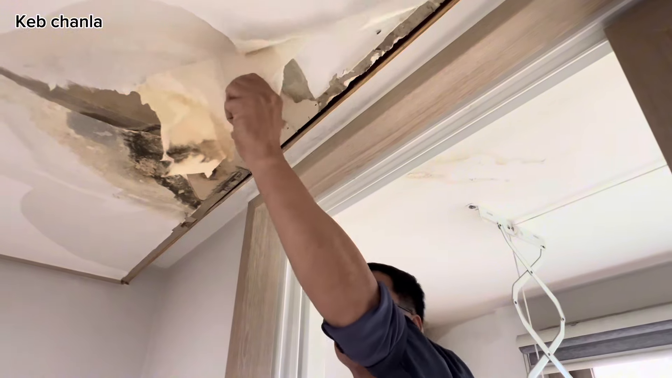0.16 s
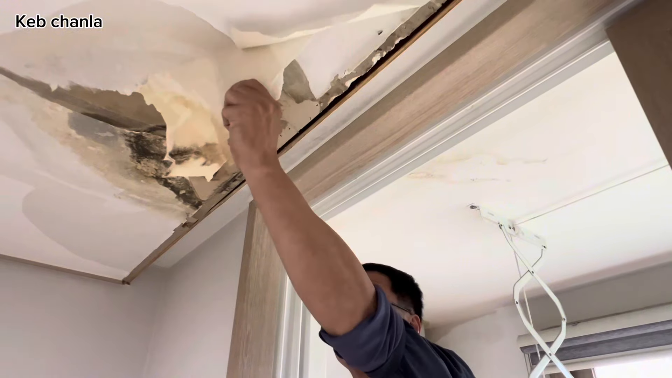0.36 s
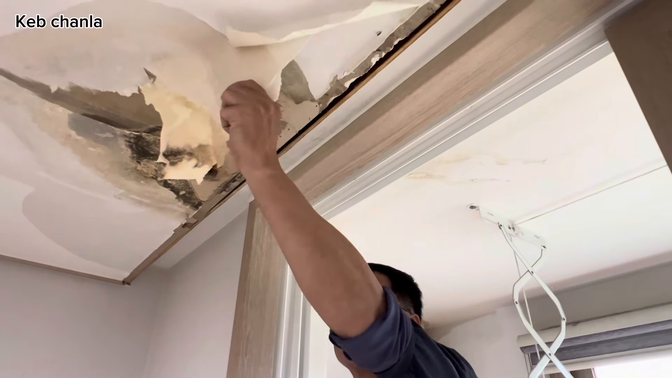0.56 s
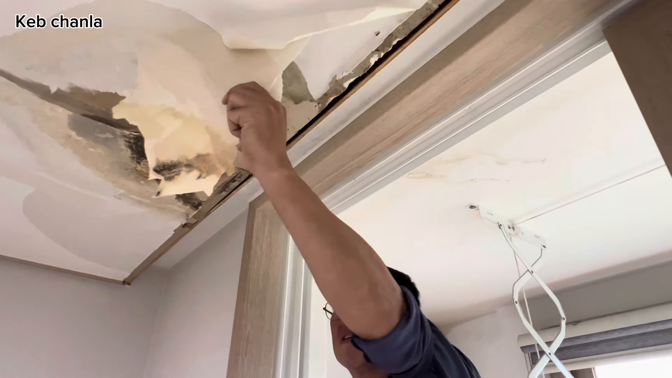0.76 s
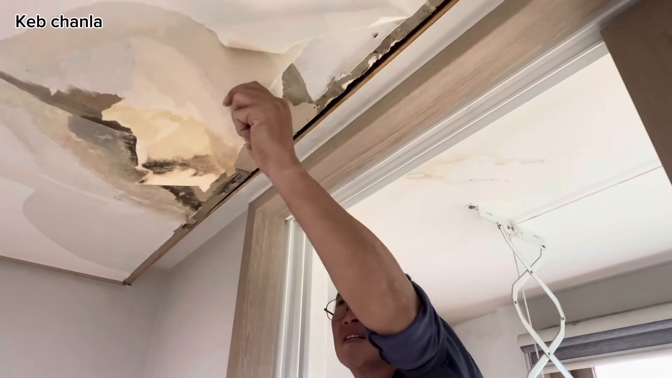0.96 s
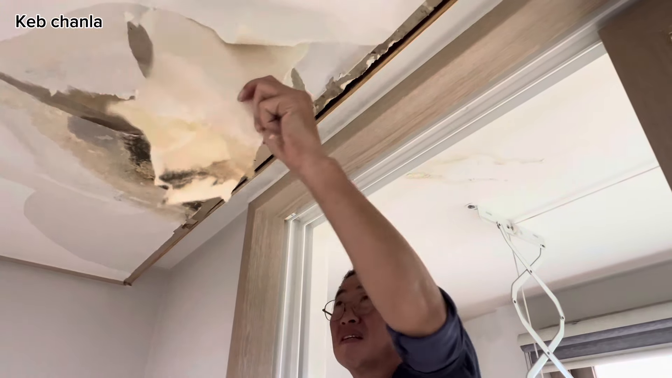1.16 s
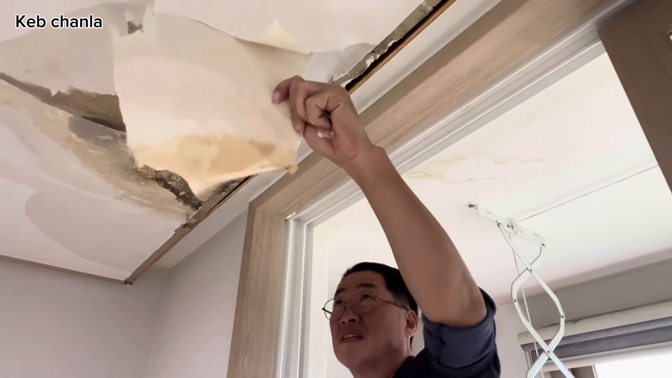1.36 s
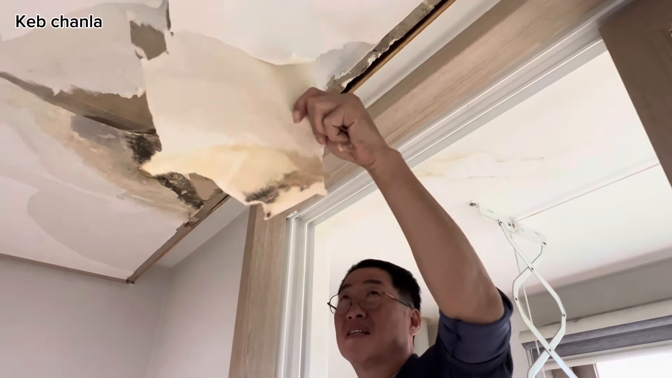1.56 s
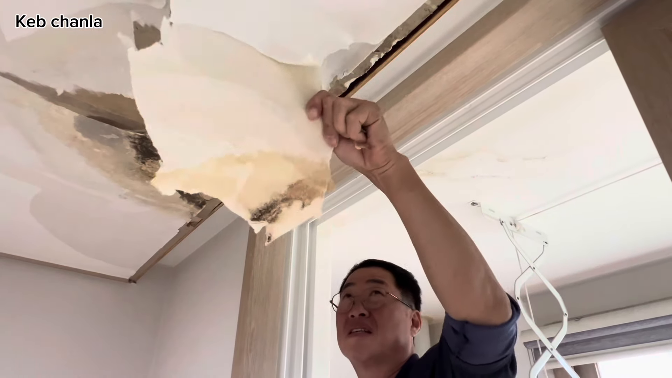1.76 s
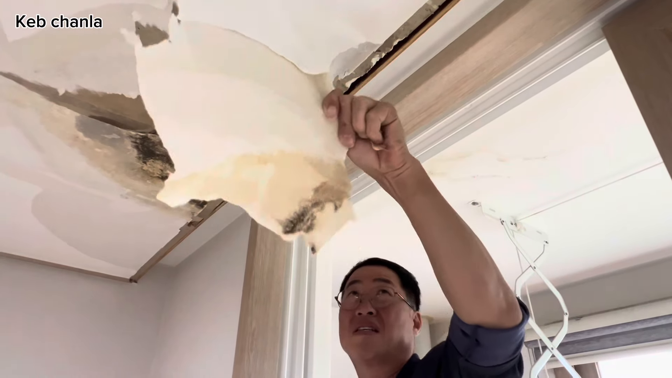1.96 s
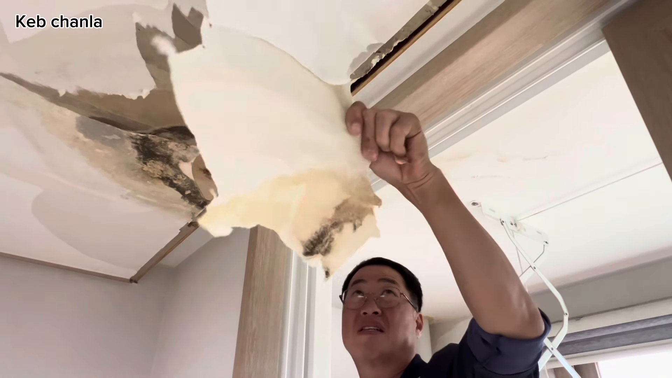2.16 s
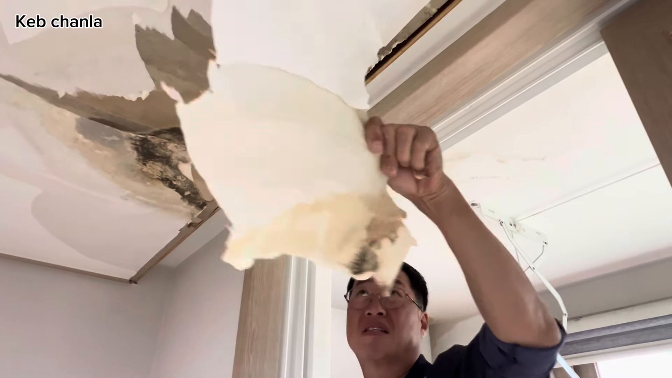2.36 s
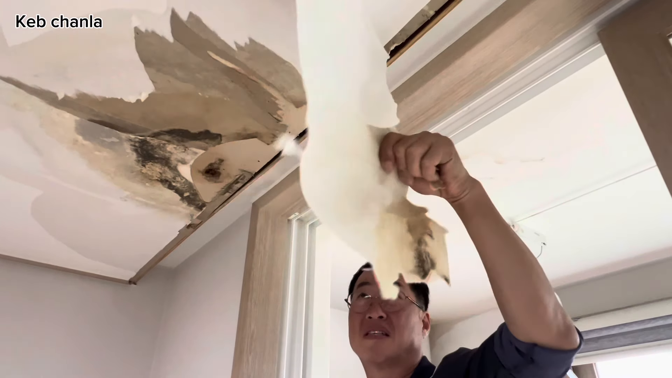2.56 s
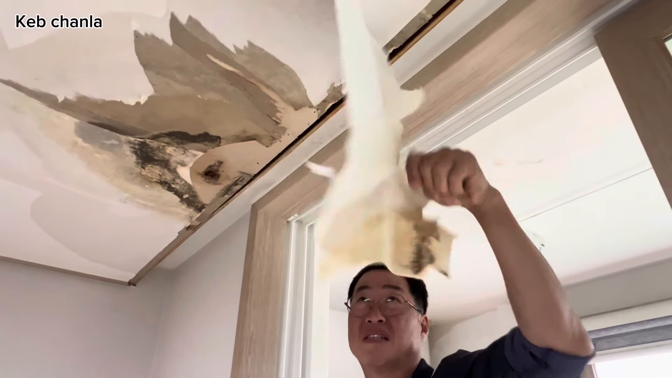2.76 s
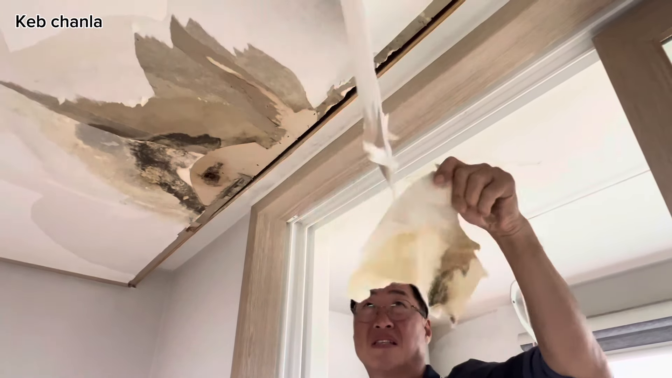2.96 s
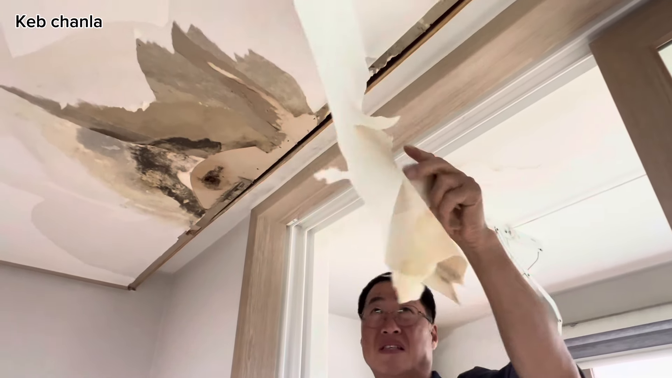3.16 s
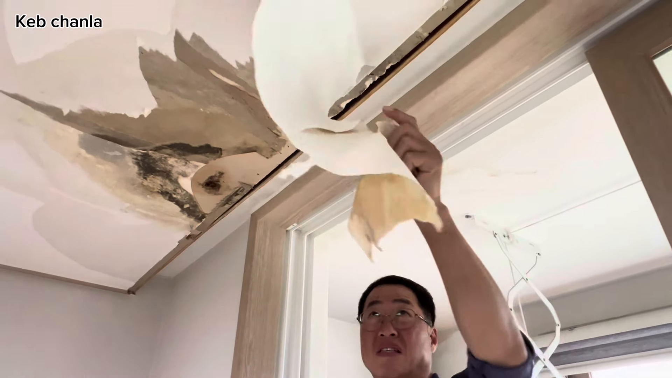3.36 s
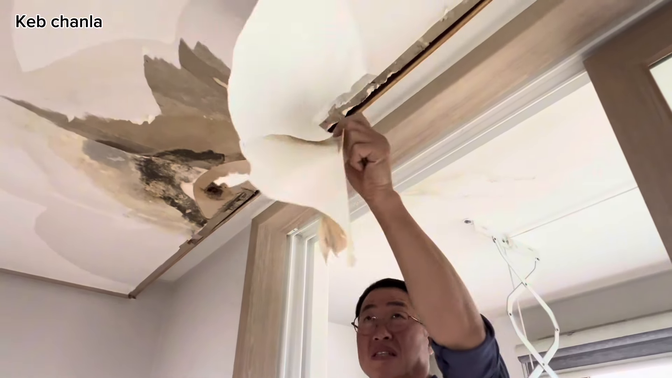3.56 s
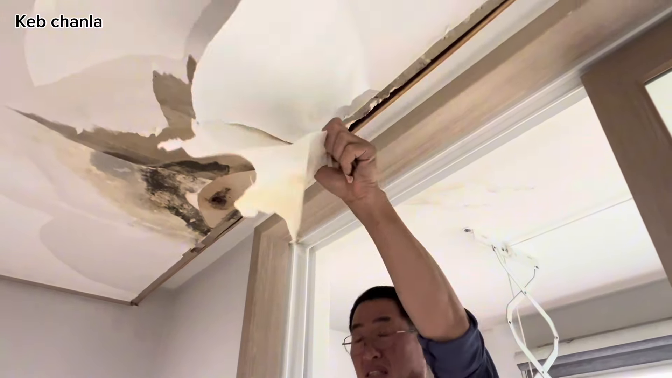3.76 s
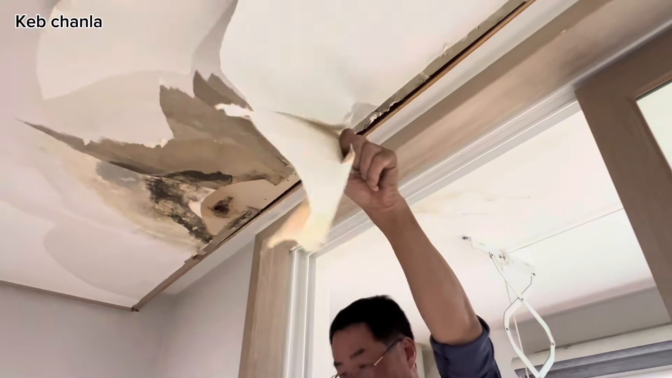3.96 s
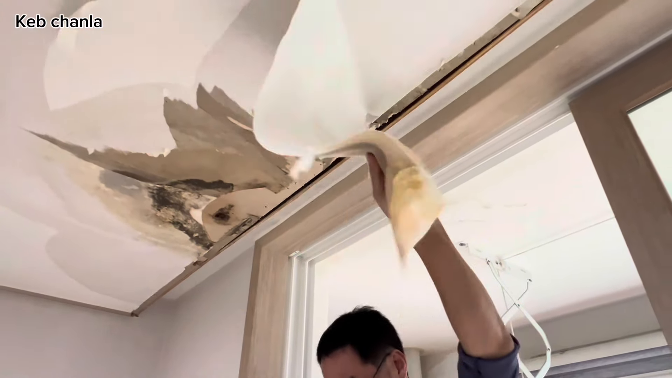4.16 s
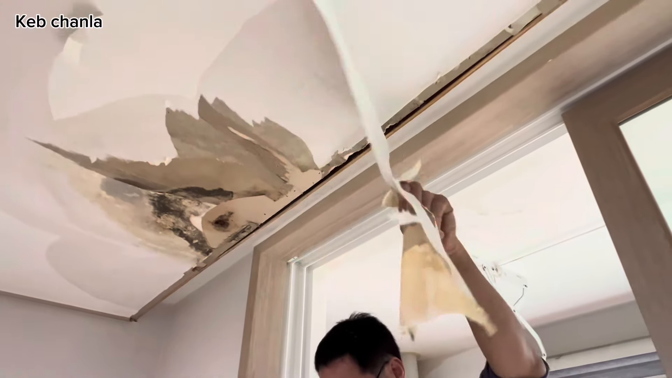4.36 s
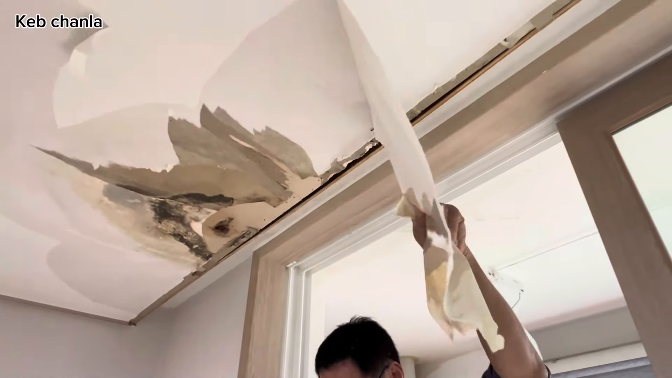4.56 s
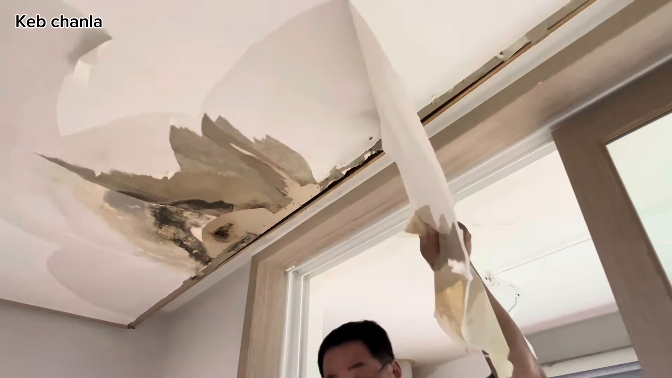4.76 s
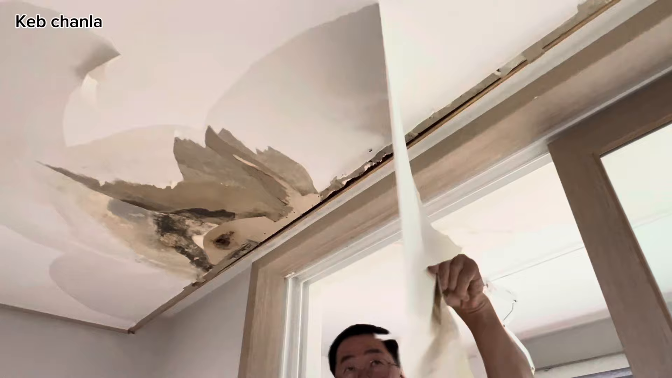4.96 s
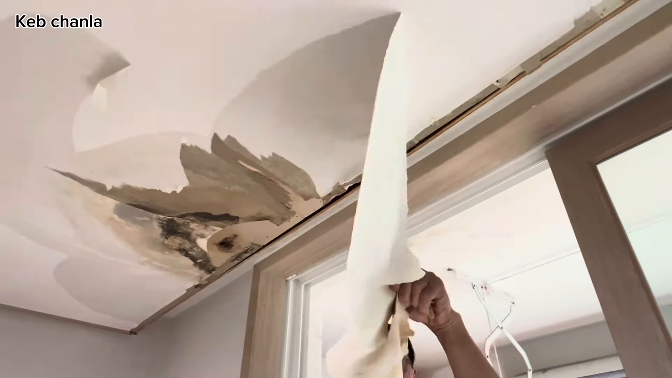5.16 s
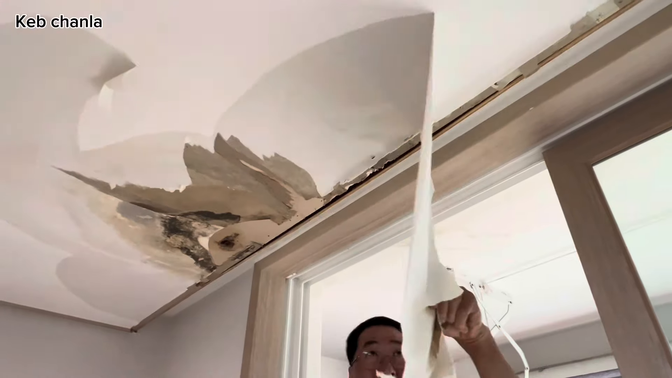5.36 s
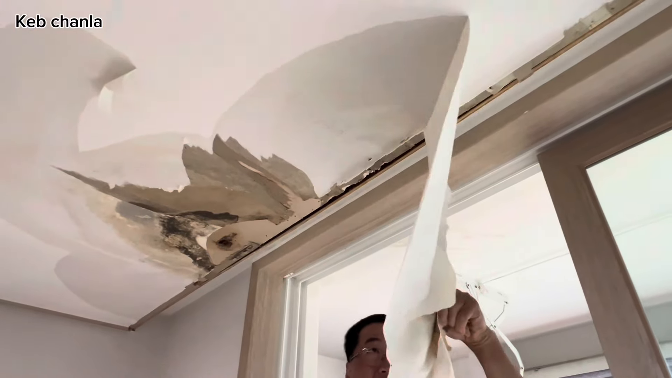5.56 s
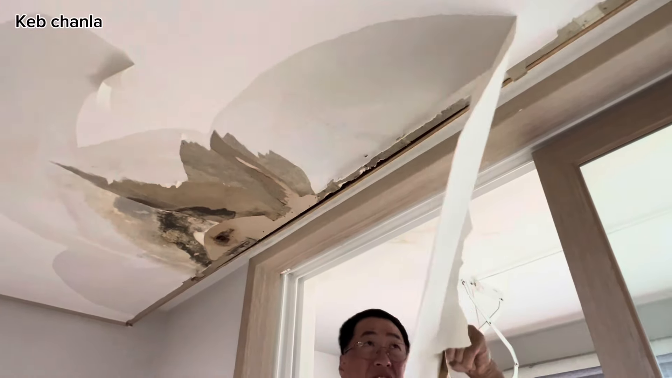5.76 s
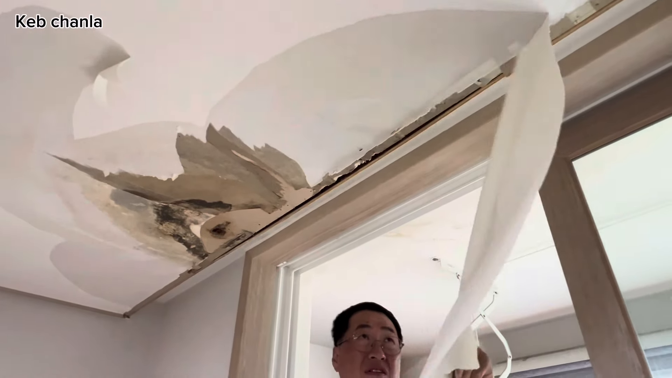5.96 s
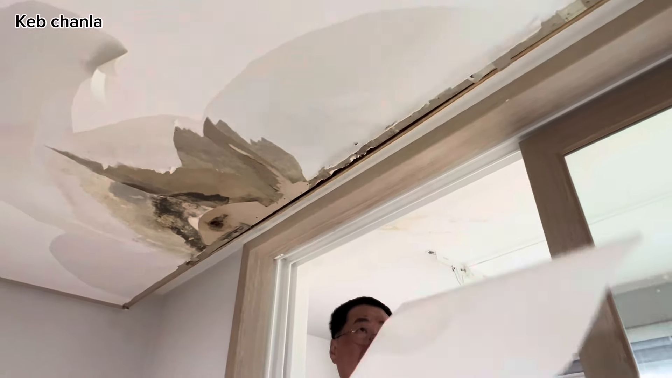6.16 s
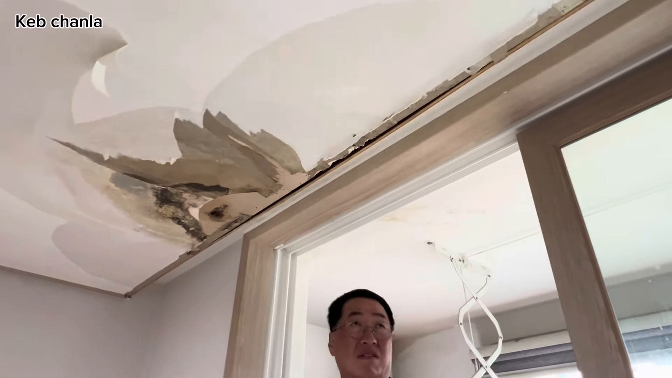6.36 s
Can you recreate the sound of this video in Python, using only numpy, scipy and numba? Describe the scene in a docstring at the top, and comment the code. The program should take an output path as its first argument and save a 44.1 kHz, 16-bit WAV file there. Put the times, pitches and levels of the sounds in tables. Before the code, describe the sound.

Close to a ceiling indoors, damp wallpaper tears loose tug by tug, crackling and rasping with bright fibre fizz and hollow fluttering of the sheet. The first rip stops, leaving light brushes and small dull pops of hanging paper. Then a hard crack and a second rip swells to its loudest, finishes with snaps, and fades into quiet room tone with a short bare-room echo.

```python
"""Wallpaper pulled off a ceiling

Damp paper comes off by hand in two long rips, tug by tug; between them the slack sheet rustles and pops.
Random trains of tiny breaks along the peel line are filtered into rasp, fizz, rustle and ringing paper.
Shaken low modes make the sheet drum and flap; noise bursts snap; falling sines pop.
A small bare room answers with sparse reflections and a short tail, over a quiet room tone."""
import sys
import numpy as np
from scipy import signal
from scipy.fft import rfft, irfft
from scipy.io import wavfile
from scipy.ndimage import uniform_filter1d, map_coordinates
from numba import njit

SR = 44100
rng = np.random.default_rng(int(sys.argv[2]) if len(sys.argv) > 2 else 0)


def inscribe(sig):
    """Save sig as 16-bit PCM at rate SR to the path in sys.argv[1].

    A 1-D sig is mono; a 2-D sig holds one channel per row.
    Samples are clipped to [-1, 1] before scaling.
    """
    pcm = np.round(np.clip(np.atleast_2d(sig).T, -1, 1) * 32767)
    wavfile.write(sys.argv[1], SR, pcm.astype(np.int16))


N = 286385
T = np.arange(N) / SR
HZ = np.fft.rfftfreq(N, 1 / SR)


def amp(db):
    """Decibels to gain."""
    return 10 ** (np.asarray(db) / 20)


def unit(x):
    """Scales to rms 1."""
    return x / np.sqrt(np.mean(x ** 2) + 1e-20)


def over_time(rows):
    """The columns of a curve table at every sample."""
    s, *columns = np.transpose(rows)
    return [np.interp(T, s, c) for c in columns]


def over_hz(points, hz):
    """Reads a spectrum table on a log-frequency axis."""
    f, value = np.transpose(points)
    return np.interp(np.log(hz + 1), np.log(f), value)


def colour(x, points):
    """Gives x a spectrum, at rms 1."""
    return unit(irfft(rfft(x) * amp(over_hz(points, HZ)), N))


def wander(top_hz):
    """Slow random curve of rms 1."""
    return unit(irfft(rfft(rng.standard_normal(N)) / (1 + (HZ / top_hz) ** 4), N))


ALIKE_HALF_HZ = 344  # microphone correlation has fallen to one half here


def diffuse(pair):
    """Sound from all sides: two nearby microphones agree only on long waves."""
    n = pair.shape[1]
    a, b = rfft(pair)
    hz = np.fft.rfftfreq(n, 1 / SR)
    same = 1 / (1 + (hz / ALIKE_HALF_HZ) ** 2)
    other = np.sqrt(np.clip(1 - same ** 2, 0, 1))
    return irfft(np.array([a, same * a + other * b]), n)


# Spectrum of the quiet room. Each row: frequency [Hz], relative level [dB].
ROOM_TONE_SPECTRUM = [(20, -1.5), (35, 11.5), (70, 12.5), (130, 8), (250, 2.5), (600, -45), (1200, -18),
                      (2500, -27), (6000, -37), (9000, -28), (16000, -66)]


def room_tone():
    """Steady coloured noise arriving from all sides."""
    return amp(-63.5) * diffuse(colour(rng.standard_normal((2, N)), ROOM_TONE_SPECTRUM))


STROKE_DB = 20  # rise over the build, equal fall over the release
STROKE_CURVE = 1.15  # above 1: round top, steep flanks


def strokes(s, build, hold, release):
    """One power envelope for each stroke of the hand: it builds, holds and lets go."""
    before = (s - T[:, None]) / abs(build)
    after = (T[:, None] - s - hold) / abs(release)
    away = np.maximum(before, after)
    return amp(-STROKE_DB * np.clip(away, 0, 10) ** STROKE_CURVE) ** 2


def level(shapes, db):
    """Joint level in dB of overlapping strokes."""
    return 10 * np.log10(shapes @ amp(db) ** 2)


def together(*levels_db):
    """Adds levels by their power."""
    return 10 * np.log10(sum(amp(db) ** 2 for db in levels_db))


def linger(db, t60):
    """The level of something that is driven at db and dies away in t60."""
    keep = amp(-60 / (abs(t60) * SR)) ** 2
    return 10 * np.log10(signal.lfilter([1 - keep], [1, -keep], amp(db) ** 2))


# Tugs, each freeing one stretch of paper. Each row: full force at [s], build [s], hold [s], release [s],
# rasp [dB], then rustle, fizz, drumming [dB re rasp], strip pitch [Hz], strip width [Hz],
# strip [dB re rasp], curl pitch [Hz], curl width [Hz], curl [dB re rustle].
TUG_STROKES = [(0.02, 0.2, 0.048, 0.099, -52, -2, -2, -2.5, 4160, 1000, -23, 1030, 700, -11),
               (0.323, 0.43, 0.16, 0.074, -45, -4.5, 3.5, -7, 3400, 1000, -20, 1030, 700, -12),
               (0.63, 0.36, 0.062, 0.27, -41.5, -3.5, 1, -1, 4340, 1000, -9, 1075, 450, -7.5),
               (0.956, 0.18, 0.074, 0.066, -37, -5.5, 0, -3.0, 4300, 1100, -3.5, 1070, 500, -16),
               (1.049, 0.077, 0.027, 0.19, -32.5, -0.5, 2.5, -0.5, 4280, 1800, -9.5, 1750, 598, -8.5),
               (1.182, 0.047, 0.019, 0.032, -35.5, -4.5, -1, 5.5, 4100, 600, -3.5, 2080, 503, 0.5),
               (1.232, 0.024, 0.012, 0.067, -45.5, -3, 2, -3, 4800, 2000, -16, 1200, 700, -14),
               (1.377, 0.055, 0.054, 0.1, -42.5, -5, -2, -14, 4450, 1800, -7, 1057, 600, -15),
               (1.49, 0.17, 0.037, 0.16, -37, 0.5, 1.5, 0.5, 3800, 2200, -2.5, 1030, 600, -16.5),
               (1.974, 0.28, 0.014, 0.32, -37, -1, 2, 1.5, 3180, 1000, -45, 540, 700, -2),
               (2.229, 0.13, 0.052, 0.074, -34.5, -6, -0.5, -11, 3450, 1200, -14.5, 1070, 400, -7.5),
               (2.31, 0.047, 0.013, 0.072, -31.5, -4, 0, -9, 2950, 800, -9, 1740, 800, -2.5),
               (2.362, 0.057, 0.026, 0.19, -30.5, -9.5, -1.5, -6.5, 3150, 700, -12, 1010, 396, -4),
               (2.503, 0.2, 0.16, 0.14, -39.5, -8.5, 0.5, -7, 3040, 1000, -16, 1470, 700, -29),
               (2.712, 0.14, 0.036, 0.066, -36, -0.5, 0.5, 2, 3650, 1600, -6.5, 1722, 240, -3.5),
               (4.279, 0.024, 0.02, 0.33, -43, -7.5, 4, -3.5, 3420, 1510, -10.5, 1020, 703, -3),
               (4.453, 0.13, 0.066, 0.092, -41, -9, 1.5, -7.5, 3630, 1690, -7.5, 910, 700, -21),
               (4.709, 0.17, 0.068, 0.38, -35.7, -8.5, 4.5, -1, 3820, 2000, -9, 950, 900, -33),
               (5.02, 0.21, 0.048, 0.46, -39, -5, 0, -2, 4970, 1500, -26.5, 1190, 697, -30),
               (5.266, 0.34, 0.16, 0.11, -35.0, -7, 4, -3.5, 6050, 1005, -11.5, 1540, 400, -22),
               (5.552, 0.18, 0.023, 0.14, -31, -4.5, 2.5, -6.5, 3360, 1000, -32.5, 1550, 400, -25),
               (5.682, 0.15, 0.055, 0.16, -30.5, -2, 1.5, -6, 2640, 700, -9.5, 1230, 300, -18),
               (5.803, 0.067, 0.027, 0.17, -41, -4.5, 0.5, -10, 2670, 900, -3, 810, 510, -8),
               (5.918, 0.11, 0.021, 0.056, -34, -3, 3, -5.5, 2620, 900, -6.5, 1160, 700, -1.5)]
# The slack sheet brushing over itself and the hand. Each row: full force at [s], hold [s],
# rasp [dB], then rustle, fizz [dB re rasp].
BRUSH_STROKES = [(1.776, .05, -61, 11.5, -3), (3.067, 0.048, -59.5, -9.5, -2),
                 (3.265, 0.064, -62.5, -12, 2.5), (3.466, 0.0098, -54, 1.5, -4),
                 (3.636, 0.088, -64, 5.5, -13), (3.866, 0.078, -63, 6, -13),
                 (4.049, 0.0064, -48.5, -0.5, -1), (4.122, 0.0075, -54, -3, 5),
                 (6.366, 0.029, -75.5, -9, -15)]
BRUSH_BUILD_S, BRUSH_RELEASE_S = 0.059, 0.059
# the hanging sheet is never quite still; its rustling comes and goes
IDLE_RASP_DB, IDLE_RUSTLE_DB, IDLE_DRUM_DB, IDLE_SWELL_DB = -79.5, -68.5, -72, -3
SETTLE_T60_S, SETTLE_DB = 0.78, -17  # freed paper goes on rustling as it settles
SWING_T60_S = 0.68  # the sheet takes up each tug slowly and swings on
SWAY_T60_S, SWAY_DB = 1.05, -6
FLAP_T60_S = 0.25  # the higher modes die sooner
FLAP_DB, FLAP_DB_PER_S = -2, 0.96  # the sheet flaps more as it grows longer


def hand():
    """Tugs and brushes set six levels in dB, and (Hz, width Hz, dB) curves of strip and curl."""
    (s, build, hold, release, db, rustle, fizz, drum,
     strip_hz, strip_width, strip, curl_hz, curl_width, curl) = np.transpose(TUG_STROKES)
    at, length, brush_db, brush_rustle, brush_fizz = np.transpose(BRUSH_STROKES)
    tug = strokes(s, build, hold, release)
    brush = strokes(at, BRUSH_BUILD_S, length, BRUSH_RELEASE_S)

    rasp_db = together(level(tug, db), level(brush, brush_db), IDLE_RASP_DB)
    crumple_db = together(level(tug, db + rustle), level(brush, brush_db + brush_rustle))
    settle_db = linger(crumple_db, SETTLE_T60_S) + SETTLE_DB
    idle_db = IDLE_RUSTLE_DB + IDLE_SWELL_DB * wander(top_hz=4.6)
    rustle_db = together(crumple_db, settle_db, idle_db)
    fizz_db = together(level(tug, db + fizz), level(brush, brush_db + brush_fizz))

    jerk_db = level(tug, db + drum)
    drum_db = together(linger(jerk_db, SWING_T60_S), IDLE_DRUM_DB)
    sway_db = together(linger(jerk_db, SWAY_T60_S), IDLE_DRUM_DB) + SWAY_DB
    # the higher modes follow both the swing and the crumpling
    flap_db = linger(0.5 * drum_db + 0.66 * crumple_db, FLAP_T60_S) + FLAP_DB + FLAP_DB_PER_S * T

    share = tug / tug.sum(1, keepdims=True)  # pitches glide from one tug to the next
    strip_ring = share @ strip_hz, share @ abs(strip_width), level(tug, db + strip)
    curl_ring = share @ curl_hz, share @ abs(curl_width), level(tug, db + rustle + curl)
    return rasp_db, rustle_db, fizz_db, drum_db, sway_db, flap_db, strip_ring, curl_ring


def breaks(per_s, spread_db):
    """A random train of tiny fractures, most weak and a few strong."""
    size = amp(spread_db * np.minimum(rng.exponential(1, N), 4))
    sign = rng.choice([-1, 1], N)
    return unit(size * sign * (rng.random(N) < per_s / SR))


@njit
def smooth(x, keep):
    """A one-pole low-pass whose memory changes from sample to sample."""
    out = np.zeros_like(x)
    for i in range(1, len(x)):
        out[i] = keep[i] * out[i - 1] + (1 - keep[i]) * x[i]
    return out


PITCH_WAVER = 0.024  # rms fraction; the uneven pull shakes strip and curl pitch


def resonate(x, hz, width_hz):
    """A wavering resonance that follows curves of pitch and width, at rms 1."""
    wavering_hz = hz * (1 + PITCH_WAVER * wander(top_hz=11))
    turn = np.exp(2j * np.pi * np.cumsum(wavering_hz) / SR)
    keep = np.exp(-np.pi * width_hz / SR)
    # shift the pitch to zero, low-pass twice, shift back
    ring = turn * smooth(smooth(x / turn, keep), keep)
    return unit(ring.real / np.sqrt(width_hz))


# Spectrum of the breaking paste. Each row: frequency [Hz], relative level [dB].
RASP_SPECTRUM = [(700, -25), (1500, -22), (2300, -4), (3000, -2), (3900, 0), (5000, -0.5), (6200, 0),
                 (7200, -2), (8200, -2), (9500, -15.5), (16000, -105)]
# Spectrum of the snapping fibres. Each row: frequency [Hz], relative level [dB].
FIZZ_SPECTRUM = [(5000, -30), (8000, -8), (9200, -6), (10200, -10), (11200, -2), (12000, 2), (13000, -1.5),
                 (14000, -9), (15000, -5), (15700, -6)]
# Spectrum of the rustling sheet. Each row: frequency [Hz], relative level [dB].
RUSTLE_SPECTRUM = [(150, -11), (300, -4), (520, -2.5), (700, -0.5), (950, -1), (1250, -1.5), (1700, -1.5),
                   (2200, -4), (3200, -6.5), (7000, -34)]
# Spectrum of coarse tearing fibres. Each row: frequency [Hz], relative level [dB].
CRACKLE_SPECTRUM = [(400, -10), (1200, -3.5), (3000, 0), (5500, -0.5), (8000, -17.5), (16000, -54)]
BREAKS_PER_S, FIBRE_SPREAD_DB = 7000, 3
SURGE_DB, CLUMP_DB = .5, 1.5  # rms slow surging and millisecond clumping of the breaks
CRACKLE_PER_S, CRACKLE_DB = 260, -12.5  # level re rasp curve
CRUMPLE_DB = 1.5  # rms; the sheet rustles in uneven little bursts


def peel_line(rasp_db, rustle_db, fizz_db, strip_ring, curl_ring):
    """Paste bonds let go in clumps; taut strip and hollow curl ring, sheet rustles; fibres fizz apart."""
    strip_hz, strip_width, strip_db = strip_ring
    curl_hz, curl_width, curl_db = curl_ring
    clumps = amp(SURGE_DB * wander(top_hz=45.2) + CLUMP_DB * wander(top_hz=348))

    # the dB subtracted below are fixed trims on the level curves
    rasp = amp(rasp_db - 1.34) * colour(breaks(BREAKS_PER_S, spread_db=2.5) * clumps, RASP_SPECTRUM)
    fibres = breaks(per_s=9000, spread_db=FIBRE_SPREAD_DB) * clumps
    fizz = amp(fizz_db - 11.0) * colour(fibres, FIZZ_SPECTRUM)
    # both pitches shift as the free length of the paper changes
    strip_breaks = breaks(BREAKS_PER_S, spread_db=6.5) * clumps
    strip = amp(strip_db) * resonate(strip_breaks, strip_hz, strip_width)
    curl_breaks = breaks(per_s=3300, spread_db=3.0) * clumps
    curl = amp(curl_db - 2.0) * resonate(curl_breaks, curl_hz, curl_width)
    rustle_gain = amp(rustle_db - 2.0 + CRUMPLE_DB * wander(top_hz=35))
    rustle = rustle_gain * colour(breaks(per_s=2500, spread_db=3.5) * clumps, RUSTLE_SPECTRUM)
    coarse = breaks(CRACKLE_PER_S, spread_db=2.5)
    crackle = amp(rasp_db + CRACKLE_DB) * colour(coarse, CRACKLE_SPECTRUM)
    return rasp + crackle + strip + rustle + curl, fizz


# Decay of the room tail. Each row: frequency [Hz], T60 [s].
TAIL_T60 = [(100, 0.7), (500, 0.48), (2000, 0.3), (6000, 0.35), (15000, 0.17)]


def echoes(early_db, tail_db):
    """The room's answer to one position of the sheet: quick ceiling reflections, then a short tail."""
    t = np.arange(2 ** 14) / SR
    signs = rng.choice([-1., 1.], (2, len(t)))
    taps = signs * (rng.random((2, len(t))) < 5000 / SR)  # 5000 reflections per s
    early = taps[:, ::-1] * (t > .0008) * np.exp(-t / 0.019)
    hz, at, z = signal.stft(taps * (t > .01), SR, nperseg=256)
    fade = np.exp(-np.log(1000) * at / over_hz(TAIL_T60, hz)[:, None])
    tail = signal.istft(z * fade, SR, nperseg=256)[1][:, :len(t)]
    return diffuse(amp(early_db) * unit(early) + amp(tail_db) * unit(tail)) / np.sqrt(len(t))


def reflections(x, early_db, tail_db, count):
    """Echoes that pass through count patterns as the breaks jump about along the sheet."""
    out = np.zeros((2, N))
    place = T * 60  # patterns passed, 60 per s
    for k in range(count):
        away = abs((place - k + count / 2) % count - count / 2)
        share = np.cos(np.pi / 2 * np.minimum(away, 1))
        out += signal.oaconvolve((x * share)[None], echoes(early_db, tail_db), axes=1)[:, :N]
    return out


# Path of the peel line past the microphones. Each row: time [s], lead of the left microphone [ms],
# left-right level [dB].
PEEL_PLACE = [(0, 0.12, 0.5), (1.1, 0.2, -2), (2, 0.11, -3), (2.8, 0.021, -9), (4.5, 0.063, -7),
              (5.1, -0.085, -9), (5.6, -0.12, -10), (6.49, -0.19, 1)]


def room(x, direct_db, early_db, tail_db, count):
    """The direct path from the peel line to the two microphones, and its reflections."""
    lead_ms, pan_db = over_time(PEEL_PLACE)
    late = map_coordinates(x, [np.arange(N) - lead_ms * SR / 1000], order=3)
    direct = amp(direct_db) * np.array([x * amp(pan_db / 2), late * amp(-pan_db / 2)])
    return direct + reflections(x, early_db, tail_db, count)


def sheet(modes):
    """Jerks of the peel line shake the low modes of the stretched sheet."""
    power = sum(amp(db) ** 2 / width / (1 + ((HZ - hz) / width * 1.72) ** 2) ** 2
                for hz, width, db in modes)
    jerks = np.array([breaks(per_s=700, spread_db=3.0) for _ in range(2)])
    ring = diffuse(irfft(rfft(jerks) * np.sqrt(power), N))
    # the steady hand keeps the swing of the sheet even
    swing = uniform_filter1d((ring ** 2).mean(0), size=4000)
    return unit(ring / np.sqrt(abs(swing) + 1e-20))


# Low modes of sheet and ceiling board. Each row: frequency [Hz], width [Hz], relative level [dB].
DRUM_MODES = [(87.8, 17.4, -0.5), (114, 14, -2.5), (141.4, 17, 0.5), (186.7, 20, -10.5)]
# Deepest mode of the sheet, ringing longest. Each row: frequency [Hz], width [Hz], relative level [dB].
SWAY_MODES = [(77.5, 26, 0)]


def drumming(drum_db, sway_db):
    """The tugged sheet drums like a slack skin on its lowest modes."""
    return amp(drum_db - 0.15) * sheet(DRUM_MODES) + amp(sway_db) * sheet(SWAY_MODES)


# Higher modes of sheet and board. Each row: frequency [Hz], width [Hz], relative level [dB].
FLAP_MODES = [(218, 16, 3.5), (240, 19, 1), (260.7, 23, 3), (325, 26, -0.5), (370, 10, 0.5),
              (419, 17, -6.5), (493, 27, -3.5), (607, 16, -4)]


def flapping(flap_db):
    """The higher modes of the sheet flap after swing and crumpling."""
    return amp(flap_db) * sheet(FLAP_MODES)


# Creases that snap, paste patches that let go at once, edges that knock or scuff.
# Each row: start [s], level [dB], centre [Hz], spread [octaves], T60 [s].
SNAP_EVENTS = [(1.02, -33.5, 1100, 0.18, 0.045), (1.042, -34, 4600, 0.27, 0.053),
               (1.082, -37, 750, 0.52, 0.14), (1.21, -28, 4130, 0.077, 0.036),
               (1.358, -49, 1200, 0.99, 0.058), (2.694, -33.5, 1050, 0.52, 0.051),
               (2.714, -33, 3000, 0.62, .035), (2.732, -32.5, 800, .7, 0.051),
               (2.757, -38, 1200, 0.69, .04), (3.426, -53.5, 1600, 1.0, 0.04),
               (3.511, -51, 750, 0.7, 0.037), (3.552, -55, 8250, 0.25, 0.008),
               (3.5525, -51.5, 2200, 1.3, 0.007), (3.556, -49, 90, .5, .12),
               (3.9738, -40.3, 950, 0.42, 0.011), (3.977, -51, 920, 0.45, 0.14), (3.983, -53, 350, .6, .03),
               (4.262, -49, 1760, 1.1, 0.035), (4.3897, -32, 12900, 0.19, .011),
               (4.3901, -28.5, 5200, 0.7, 0.015), (4.397, -32, 6300, 0.45, .05),
               (5.703, -33, 600, 0.92, 0.047), (5.932, -27.5, 6400, 0.45, 0.07),
               (6.0502, -35, 820, 1.1, 0.014), (6.053, -48.5, 820, .7, .2), (6.068, -41, 1100, 0.7, 0.013),
               (6.278, -63, 460, 0.23, 0.12), (6.283, -59, 150, 0.64, 0.065)]
CRACK = 9  # first break re the crackle after it, in the limit of a very short snap


def snaps():
    """A crease buckles: a sharp crack and a short crackle that dies at once in the damp paper."""
    out, t = np.zeros(N), np.arange(8192) / SR
    octave = np.log2(np.fft.rfftfreq(len(t), 1 / SR) + 1)
    for s, db, hz, spread, t60 in SNAP_EVENTS:
        fade = np.exp(-np.log(1000) * t / t60)
        # long scuffs start without a crack
        crack = CRACK * np.exp(-(t60 / 0.022) ** 2)
        burst = rng.standard_normal(len(t)) * fade
        burst[0] = crack
        log_gain = np.maximum(-.5 * ((octave - np.log2(hz)) / spread) ** 2, -9)
        # causal (minimum-phase) colour: the paper rings only after the crack
        mirrored = np.r_[log_gain, log_gain[-2:0:-1]]
        band = np.exp(np.conj(signal.hilbert(mirrored)))[:len(octave)]
        rms = np.sqrt((crack ** 2 + np.sum(fade ** 2)) / len(t))
        burst = unit(irfft(rfft(burst) * band)) * rms
        part = out[round(s * SR):][:len(t)]
        part += amp(db) * burst[:len(part)]
    return out


# The slack sheet popping over in the hand. Each row: start [s], level [dB], starting pitch [Hz].
FLICK_EVENTS = [(3.5532, -48, 1200), (3.6425, -46, 600), (3.776, -54, 1000), (3.783, -52, 600),
                (3.8103, -50, 750), (3.817, -48, 480), (4.3905, -29, 2600), (4.398, -36, 600)]
BEND_S, FLICK_T60_S = 0.0069, 0.023  # the pitch falls to a quarter in BEND_S


def flicks():
    """The slack sheet pops over: short bending waves outrun the long ones, so the pitch drops fast."""
    out, t = np.zeros(N), np.arange(4096) / SR
    fade = np.exp(-np.log(1000) * t / FLICK_T60_S)
    for s, db, hz in FLICK_EVENTS:
        turns = np.cumsum(hz / (1 + t / BEND_S) ** 2) / SR
        pop = amp(db) * np.sin(2 * np.pi * turns) * fade
        part = out[round(s * SR):][:len(t)]
        part += pop[:len(part)]
    return out


SNAP_PAN_DB, SNAP_TAIL_DB = -3, -15  # left-right level; room tail


def nearby(x, early_db):
    """Snaps and flicks come from the hanging end: a crisp direct sound with little tail."""
    direct = amp([[SNAP_PAN_DB / 2], [-SNAP_PAN_DB / 2]]) * x
    return direct + reflections(x, early_db, SNAP_TAIL_DB, count=3)


def scene():
    """The rips, the drumming sheet, the snaps and the pops over a quiet room."""
    rasp_db, rustle_db, fizz_db, drum_db, sway_db, flap_db, strip_ring, curl_ring = hand()
    tear, fizz = peel_line(rasp_db, rustle_db, fizz_db, strip_ring, curl_ring)
    rip = room(tear, direct_db=-2.5, early_db=0.5, tail_db=-6.0, count=15)
    # the direct fizz reaches both microphones alike
    fizz = fizz + reflections(fizz, early_db=3.0, tail_db=-29, count=4)
    body = drumming(drum_db, sway_db) + flapping(flap_db)
    return room_tone() + rip + fizz + body + nearby(snaps() + flicks(), early_db=-3.0)


# Colour of the microphone ports. Each row: frequency [Hz], left-right level [dB].
PORT_TILT = [(60, 0), (150, 1.5), (280, 5.5), (550, 1.5), (1200, 4), (2200, 0.5), (3000, 1.5), (4000, 1.5),
             (5500, 5.5), (6600, 7), (7300, -1.5), (8100, 5), (8800, -10.5), (10500, 1)]
LOW_CUT_HZ, EDGE_HZ = 36, 15800


def record(dry):
    """Each microphone port has its own colour; deep rumble is cut; then the band limit."""
    tilt_db = over_hz(PORT_TILT, HZ) / 2
    low_cut = HZ ** 4 / np.sqrt(HZ ** 8 + LOW_CUT_HZ ** 8)
    heard = irfft(rfft(dry) * amp([tilt_db, -tilt_db]) * low_cut, N)
    band_limit = signal.firwin(511, EDGE_HZ, window=("kaiser", 9), fs=SR)
    return signal.oaconvolve(heard, band_limit[None], "same")


dry = scene()
out = record(dry)
inscribe(out)
```